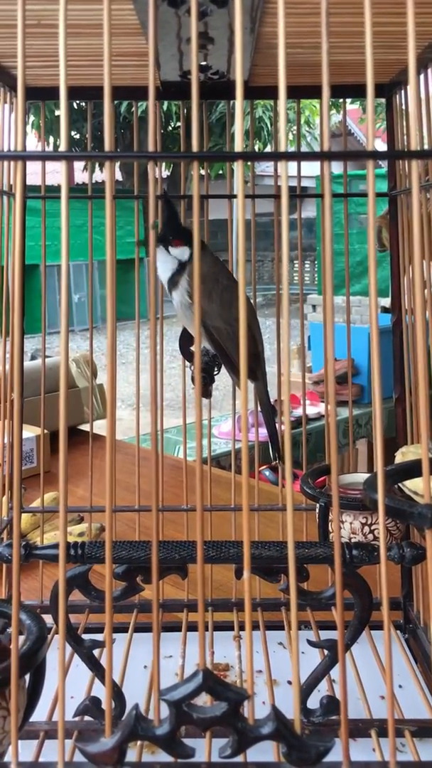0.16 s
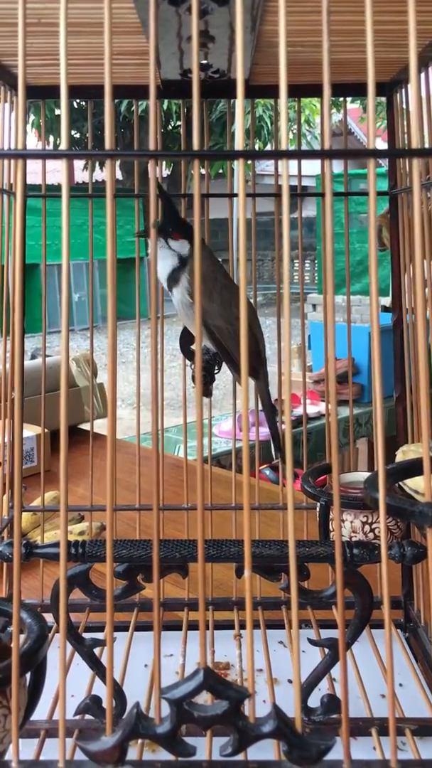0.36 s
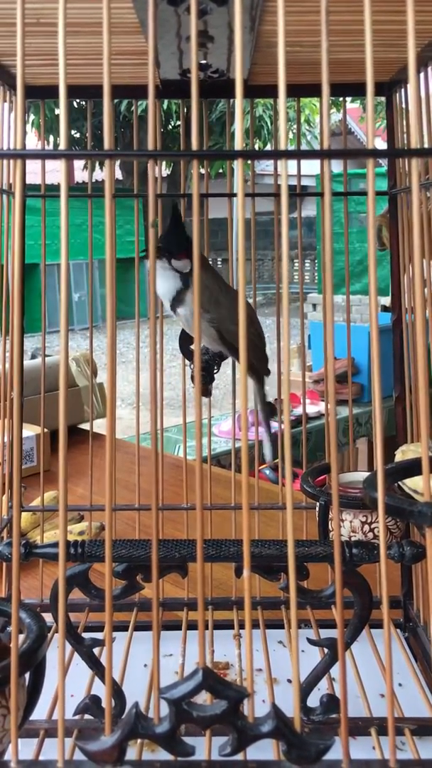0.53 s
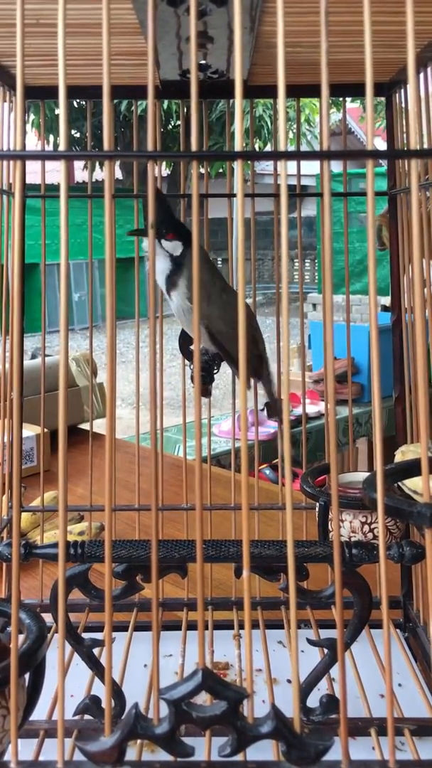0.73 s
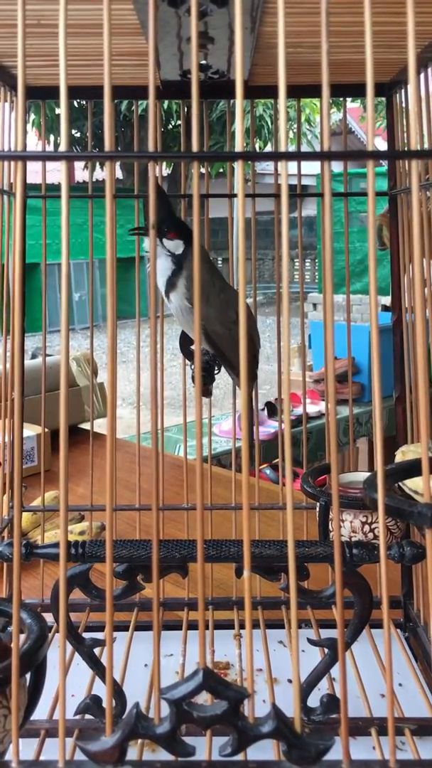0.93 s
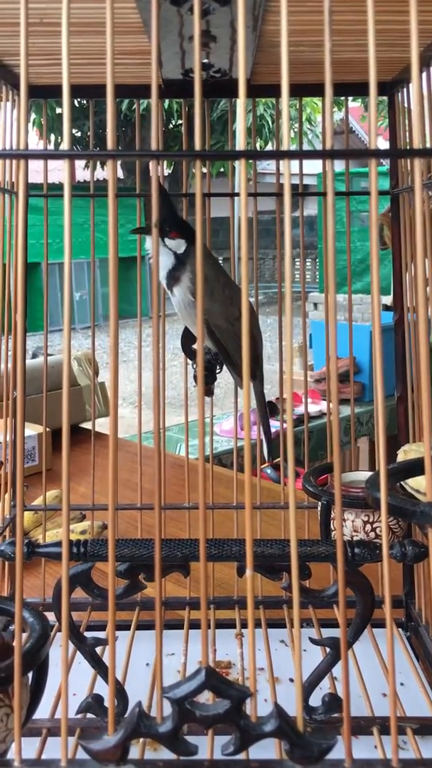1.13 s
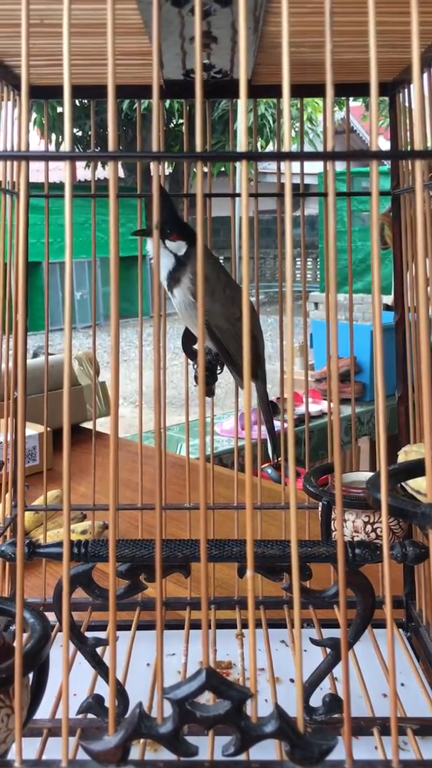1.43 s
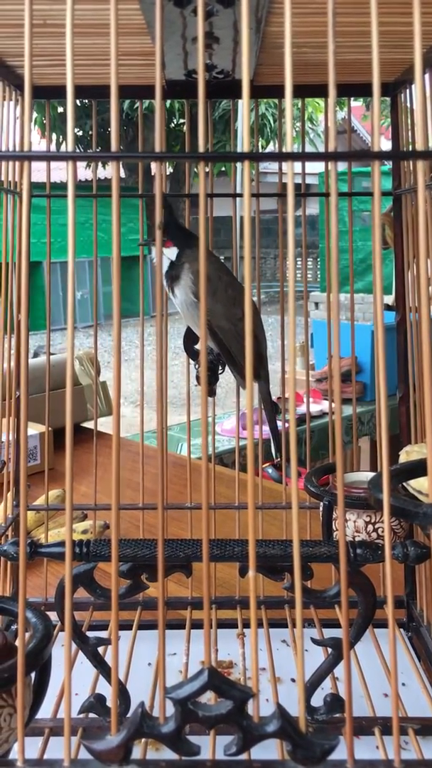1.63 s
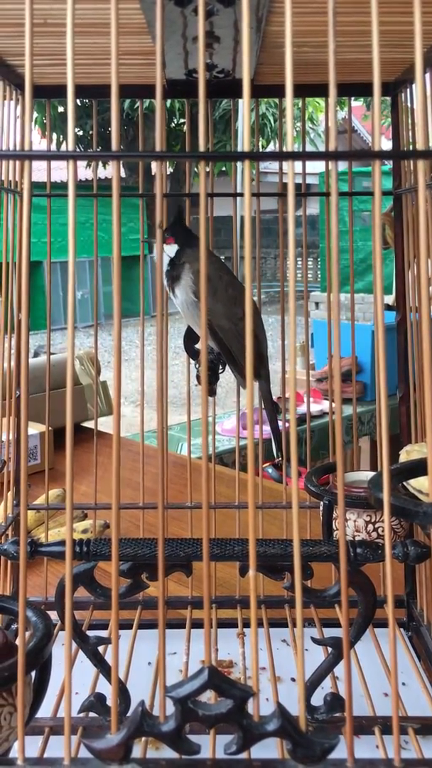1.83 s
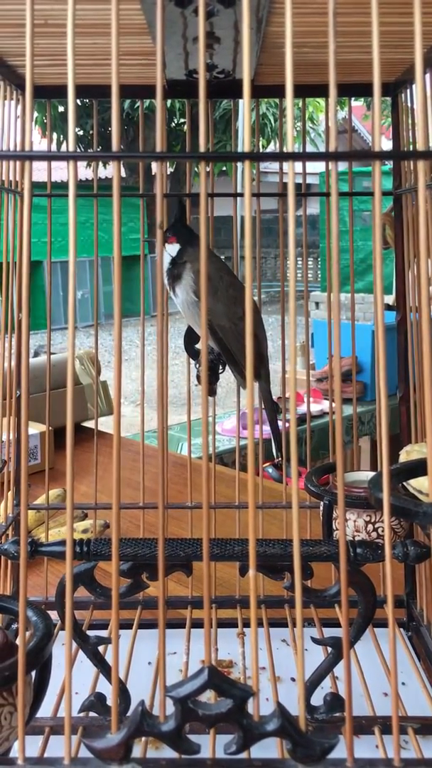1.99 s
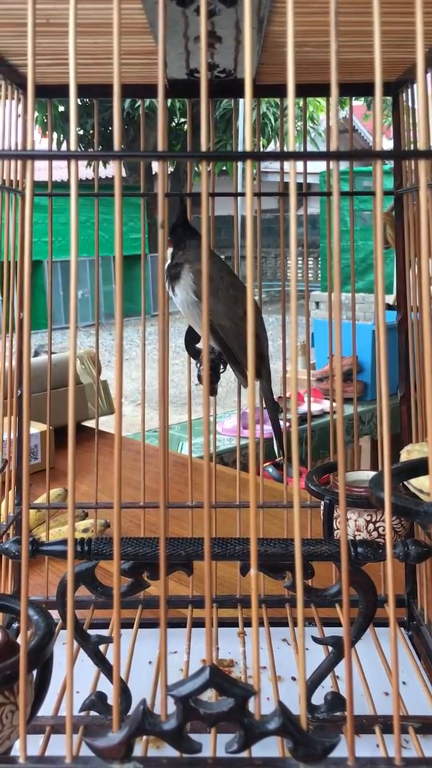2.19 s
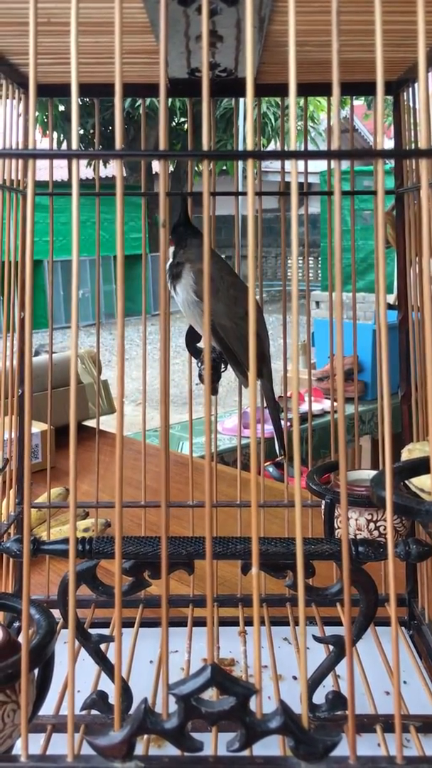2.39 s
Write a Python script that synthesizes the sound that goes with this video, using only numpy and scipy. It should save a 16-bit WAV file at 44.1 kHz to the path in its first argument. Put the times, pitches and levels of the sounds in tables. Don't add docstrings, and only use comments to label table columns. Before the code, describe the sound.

A caged songbird whistles five quick, loud trilled notes while a small engine idles behind it

```python
import sys
import numpy as np
from scipy import signal
from scipy.io import wavfile
from scipy.ndimage import uniform_filter1d

SR = 44100
rng = np.random.default_rng(int(sys.argv[2]) if len(sys.argv) > 2 else 0)


def ratio_of_db(decibels):
    return 10 ** (np.asarray(decibels, float) / 20)


def dump_mix(stems):
    frames = np.atleast_2d(stems).T
    limited = np.clip(frames, -1, 1)
    pcm = np.round(limited * 32767).astype(np.int16)
    wavfile.write(sys.argv[1], SR, pcm)


N = 112454
T = np.arange(N) / SR

# centre_hz, density_db_per_hz
STREET_SPECTRUM = [(140, -4.5), (400, -10.5), (800, -16.5), (1150, -12), (1880, -14.5), (4480, -21),
                   (8000, -29.5), (15500, -57)]
# time_s, street_db, hiss_db
AIR_LEVELS = [
    (0, -37.5, -40),
    (.2, -37, -69),
    (.4, -43.5, -48),
    (.65, -43.5, -44.5),
    (1, -41, -39.5),
    (1.3, -37.5, -39),
    (1.8, -37, -40),
    (2.2, -37.5, -39),
    (2.55, -37.5, -52),
]
# centre_hz, width_hz, level_db
HISS_BANDS = [(2570, 500, 5.5), (5090, 57, -9.5), (6196, 810, -1), (7420, 110, -4.5), (8510, 440, -3.5),
              (10100, 150, -11), (11200, 570, -13), (15130, 30, -29)]
# time_s, firings_so_far
FIRING_COUNT = [
    (-.03, 0),
    (.636, 10),
    (.697, 11),
    (.985, 16),
    (1.041, 17),
    (1.860, 32),
    (1.977, 34),
    (2.571, 43),
]
# centre_hz, width_hz, level_db
EXHAUST_MODES = [(68.8, 13.8, 2), (110.1, 20.3, 3.5), (133.5, 14, -14), (184.5, 15, -10.5),
                 (216.3, 11, -25), (360, 210, -14)]
# time_s, level_db, upper_mode_lean_db
ENGINE_LEVELS = [
    (0, -34, -6.5),
    (.3, -33.5, -4.5),
    (.7, -34.5, -0.5),
    (1, -37, 2),
    (1.25, -33.5, 0.5),
    (1.8, -35, 3),
    (2.05, -30, -2.5),
    (2.55, -31, -3),
]
# time_s, level_db
WHINE_LEVELS = [(0.0, -67), (0.01, -59), (0.41, -49.5), (0.68, -68), (0.75, -55.5), (0.97, -67),
                (1.35, -56), (1.7, -64), (1.79, -52.5), (1.92, -62), (1.99, -51.5), (2.55, -59)]
# start_s, length_s, level_db
INSECT_CHIRPS = [
    (.38, .07, -57),
    (1.75, 0.18, -49),
    (1.937, 0.11, -45.5),
    (2.142, 0.14, -46.5),
    (2.316, .12, -52.5),
]
# start_s, length_s, from_hz, to_hz, peak_db
FAR_CALLS = [(-.04, .12, 2420, 2390, -32), (.02, .08, 1880, 1870, -41), (1.12, .05, 2650, 2550, -45),
             (1.525, .05, 2430, 2420, -29), (1.50, .12, 2450, 2400, -38), (1.61, .06, 1720, 1690, -41),
             (1.68, .04, 1780, 1720, -42), (1.72, .04, 1700, 1660, -43), (1.822, .04, 2920, 2920, -30),
             (1.845, .035, 3450, 2900, -30), (1.865, .08, 3100, 2880, -34), (1.95, .04, 2950, 3000, -37),
             (1.905, .11, 3620, 3550, -39), (1.72, .07, 3330, 3450, -41), (1.93, .014, 1550, 1250, -36),
             (1.95, .014, 1450, 1200, -38), (2.16, .03, 1500, 1300, -42)]
# time_s, pitch_hz, peak_level_db
SONG_TRACKS = [
    [(.219, 1950, -28), (.225, 1900, -25), (.228, 2300, -13), (.233, 2380, -13), (.240, 2330, -5),
     (.255, 2400, -5), (.263, 2520, -2), (.268, 2400, -6), (.273, 2500, -7)],
    [(.452, 1500, -36), (.460, 2050, -18), (.464, 1930, -17), (.470, 2000, -18), (.472, 2280, -5),
     (.478, 2320, -3), (.488, 2440, -1.5), (.496, 2390, -4), (.4985, 2420, -5)],
    [(.4995, 2850, -5), (.503, 2960, -2.5), (.514, 2960, -2.5), (.518, 2580, -3), (.527, 2520, -1.5),
     (.533, 2510, -7), (.543, 2440, -4), (.546, 2420, -12), (.552, 2520, -16)],
    [(.652, 3750, -22), (.655, 3250, -19), (.657, 2500, -19), (.661, 2750, -15), (.665, 3380, -8),
     (.670, 3100, -8), (.676, 2880, -5), (.680, 2850, -10), (.682, 2850, -30)],
    [(.733, 1100, -26), (.740, 2350, -23), (.744, 1850, -18), (.753, 2380, -5), (.762, 2750, -4),
     (.767, 2900, -2), (.7705, 3350, -7), (.780, 3250, -4), (.788, 3280, -8)],
    [(.859, 3850, -21), (.864, 2800, -17), (.870, 2720, -13), (.874, 3050, -4), (.880, 2550, -7),
     (.887, 2390, -3), (.898, 2340, -4), (.905, 2250, -11), (.943, 2080, -18)],]
# crest_s, rate_hz, pitch_flick_hz, trough_dip_0_1, crest_dip_0_1
TRILLS = [
    (.2420, 110, 520, .35, .3),
    (.488, 105, 15, 0, 0),
    (.503, 105, 20, 0, 0),
    (.666, 100, 10, .05, 0),
    (.7695, 135, 160, 0, 0),
    (.888, 100, 40, 0, 0),
]
# overtones_db, air_db
SEGMENT_TONE = [
    (-3, -7),
    (-2, -1),
    (-3, -5),
    (7, -5),
    (-2, -2),
    (1, 0),
]
OVERTONE_LEVELS = [-37, -43, -44, -42, -42]
# time_s, half_width_s, depth_0_1
AIRFLOW_CATCHES = [(.2312, .0012, .6), (.2378, .0012, .7), (.2495, .0006, .6), (.2555, .001, .4),
                   (.4805, .002, .35), (.4955, .003, .35), (.508, .0013, .95), (.5185, .002, .4),
                   (.5335, .003, .4), (.538, .0015, .6), (.5465, .0015, .5), (.756, .0015, .95),
                   (.7623, .001, .95), (.7693, .0008, .85), (.771, .0006, .6), (.773, .0006, .6),
                   (.7765, .0015, .4), (.8765, .001, .75), (.8805, .0007, .7), (.8932, .0014, .95),
                   (.9043, .002, .9), (.912, .002, .4), (.9185, .0015, .6), (.926, .0015, .6),
                   (.934, .002, .75)]
# centre_hz, width_hz, level_db
BEAK_MODES = [(11000, 400, 0), (12100, 600, -3), (13200, 500, -11), (14600, 800, -11)]
# delay_s, level_db
WALL_ECHOES = [(.0043, -18), (.0095, -19), (.0170, -17)]
# centre_hz, width_hz, level_db
PORCH_MODES = [(2140, 7, 3), (2220, 8, 1), (2470, 9, -7), (2550, 8, -3), (2920, 10, -9), (3090, 12, -2),
               (3220, 11, 2), (3340, 10, -5)]


def to_rms(x, db):
    return x * ratio_of_db(db) / np.sqrt(np.mean(x ** 2))


def curve(table, index):
    a = np.array(table, float)
    return np.interp(T, a[:, 0], a[:, index])


def resonate(x, hz, width_hz):
    return signal.lfilter(*signal.iirpeak(min(hz, .45 * SR), hz / width_hz, fs=SR), x)


def resonate_twice(x, hz, width_hz):
    return resonate(resonate(x, hz, width_hz), hz, width_hz)


def noise():
    return rng.standard_normal(N)


def walk(rate_hz):
    k = int(SR / rate_hz)
    held = np.repeat(rng.standard_normal(N // k + 1), k)
    return 1.602 * uniform_filter1d(uniform_filter1d(held, k), k)[:N]


def arch(start_s, length_s):
    return np.sin(np.pi * np.clip((T - start_s) / length_s, 0, 1))


def tone(hz):
    return np.sin(2 * np.pi * np.cumsum(hz) / SR)


def street(count):
    a = np.array(STREET_SPECTRUM)
    traffic = 0
    for hz in 150 * 2 ** np.arange(0, 6.7, 1 / 3):
        db = np.interp(np.log(hz), np.log(a[:, 0]), a[:, 1]) + 10 * np.log10(hz)
        flicker_db = 2.53 * walk(9.39)
        traffic = traffic + ratio_of_db(db + flicker_db) * to_rms(resonate_twice(noise(), hz, hz / 3.9), 0)
    hiss = sum(ratio_of_db(0.5 * walk(3.07)) * to_rms(resonate(noise(), hz, width_hz), db)
               for hz, width_hz, db in HISS_BANDS)
    rumble = to_rms(resonate_twice(noise(), 85, 86), -47)
    puff = ratio_of_db(0.5 * np.cos(2 * np.pi * count))
    traffic = ratio_of_db(curve(AIR_LEVELS, 1)) * to_rms(traffic, 0)
    hiss = ratio_of_db(curve(AIR_LEVELS, 2)) * to_rms(hiss, 0)
    return puff * (traffic + hiss) + rumble


def whine():
    centre_hz, width_hz = 1093, 12.7
    return ratio_of_db(curve(WHINE_LEVELS, 1) + 10.0) * tone(centre_hz + width_hz * walk(29.62) / 2)


def insect():
    chirps = sum(ratio_of_db(db) * np.sqrt(arch(start_s, length_s)) for start_s, length_s, db in INSECT_CHIRPS)
    return chirps * tone(9400 + 6 * walk(20))


def engine(count):
    fired = np.diff(np.floor(count), prepend=-1) > 0
    strength = ratio_of_db(1 * rng.standard_normal(60))
    pulses = fired * strength[count.astype(int)]
    lean_db = curve(ENGINE_LEVELS, 2)
    out = 0
    for k, (hz, width_hz, db) in enumerate(EXHAUST_MODES):
        mode = to_rms(resonate(resonate(pulses, hz, width_hz * 2), hz, width_hz), -7.0)
        mode_db = db + (lean_db if k else -lean_db)
        out = out + (-1) ** k * ratio_of_db(mode_db) * mode
    return ratio_of_db(curve(ENGINE_LEVELS, 1)) * out


def far_birds():
    out = 0
    for start_s, length_s, from_hz, to_hz, db in FAR_CALLS:
        hz = np.interp(T, [start_s, start_s + length_s], [from_hz, to_hz]) + 10 * walk(120)
        out = out + ratio_of_db(db + 1.3 * walk(90.4)) * arch(start_s, length_s) ** 1.46 * tone(hz)
    return out


def room(x, t60_s, damp):
    t = T[:SR // 2]
    tail = rng.standard_normal(len(t)) * ratio_of_db(-60 * t / t60_s) * np.clip(t / 0.0059, 0, 1)
    tail = signal.lfilter([1], [1, -np.clip(damp, 0, .9)], tail)
    return signal.fftconvolve(x, tail / np.sqrt(np.sum(tail ** 2)))[:N]


def porch(near):
    early = sum(ratio_of_db(db) * np.roll(near, int(delay_s * SR)) for delay_s, db in WALL_ECHOES)
    tail = ratio_of_db(-23) * room(near, t60_s=0.36, damp=0.7)
    modes = sum(ratio_of_db(db) * resonate(near, hz, width_hz) for hz, width_hz, db in PORCH_MODES)
    return early + tail + modes


def breath():
    sos = signal.butter(6, 10600, "high", fs=SR, output="sos")
    air = signal.sosfilt(sos, noise())
    shaped = sum(ratio_of_db(db + 4.0 * walk(80.2)) * resonate(air, hz, width_hz) for hz, width_hz, db in BEAK_MODES)
    return to_rms(shaped, -36)


def overtones(hz, turn, top_db):
    top_db = top_db + 8 * (hz - 3000) / 1000
    out = 0
    for k, db in enumerate(OVERTONE_LEVELS, 2):
        bright_db = 8 * np.exp(-((k * hz - 10200) / 2500) ** 2)
        rasp = 1 + 0.9 * walk(700)
        out = out + ratio_of_db(db + top_db + bright_db) * rasp * np.sin(k * turn) * (k * hz < .4 * SR)
    return out


def bird():
    song_db, shimmer_db, waver_hz, edge_s = -1, 1.04, 32, .002
    out = 0
    air = breath()
    flow = np.prod([1 - depth * np.exp(-((T - s) / half_s) ** 2) for s, half_s, depth in AIRFLOW_CATCHES], axis=0)
    segments = zip(SONG_TRACKS, TRILLS, SEGMENT_TONE)
    for track, (crest_s, rate_hz, flick_hz, low, high), (top_db, air_db) in segments:
        trill = .5 + .5 * np.cos(2 * np.pi * rate_hz * (T - crest_s))
        hz = uniform_filter1d(curve(track, 1), size=40) + flick_hz * trill ** 2 + waver_hz * walk(250)
        turn = 2 * np.pi * np.cumsum(hz) / SR
        attack = np.clip((T - track[0][0]) / edge_s, 0, 1)
        release = np.clip((track[-1][0] - T) / edge_s + 1, 0, 1)
        gate = attack * release
        dips = 1 - low * (1 - trill) ** 2 - high * trill ** 4
        gain = gate * ratio_of_db(song_db + curve(track, 2) + shimmer_db * walk(300)) * dips * flow
        top = overtones(hz, turn, top_db)
        half_line = ratio_of_db(-40 + 8.2 * walk(38.8)) * np.sin(3 / 2 * turn)
        hissing = gate * ratio_of_db(-1.5) * gain ** 0.42 * ratio_of_db(air_db) * air
        out = out + gain * (np.sin(turn) + half_line + top) + hissing
    return out


def scene():
    count = curve(FIRING_COUNT, 1)
    near, far = bird(), far_birds()
    song = near + porch(near)
    far = far + ratio_of_db(-10) * room(far, t60_s=.35, damp=0.7)
    return (song + far + engine(count) + street(count) + whine() + insect())[None]


def top_cut(x):
    return signal.sosfilt(signal.butter(12, 15810, fs=SR, output="sos"), x)


def record(dry):
    x = signal.sosfilt(signal.butter(2, 45, "high", fs=SR, output="sos"), dry)
    mix = np.tanh(0.57 * x) / 0.55
    return top_cut(mix)


dry = scene()
out = record(dry)
dump_mix(out)
```